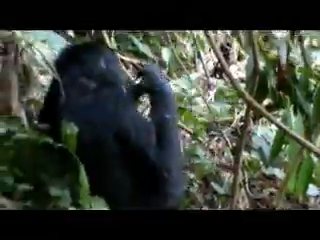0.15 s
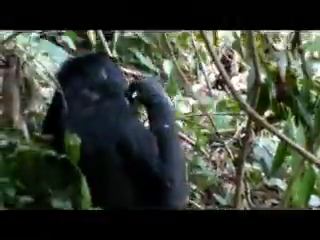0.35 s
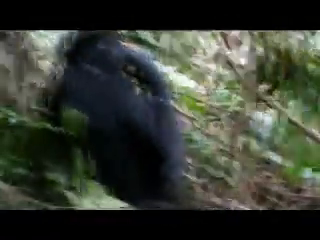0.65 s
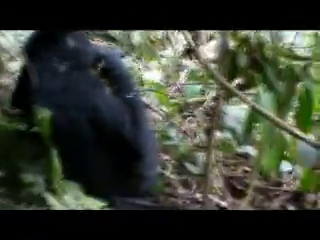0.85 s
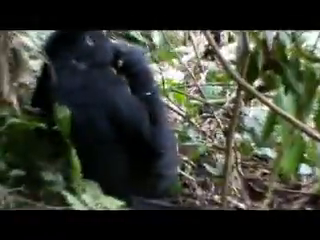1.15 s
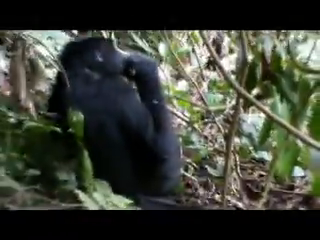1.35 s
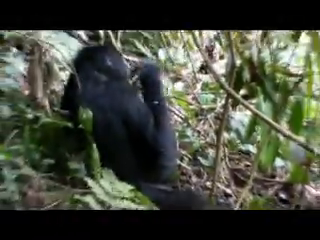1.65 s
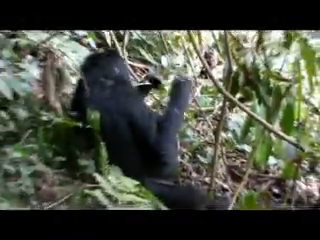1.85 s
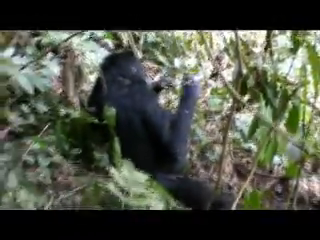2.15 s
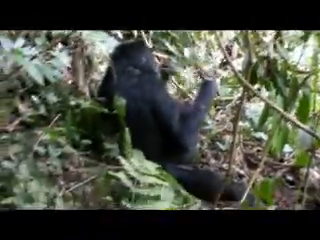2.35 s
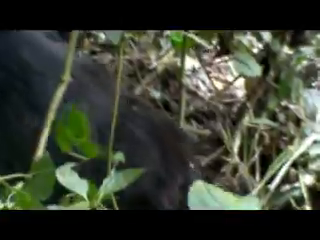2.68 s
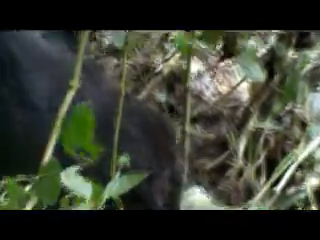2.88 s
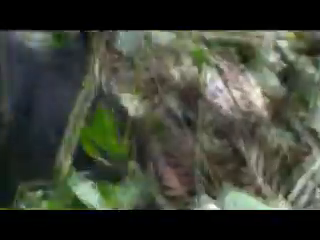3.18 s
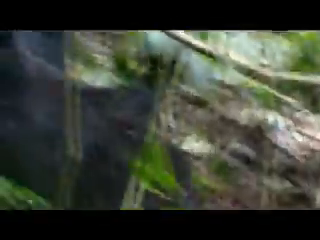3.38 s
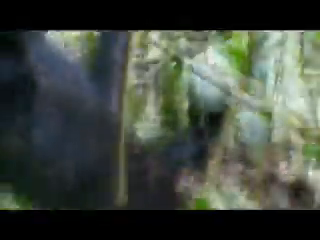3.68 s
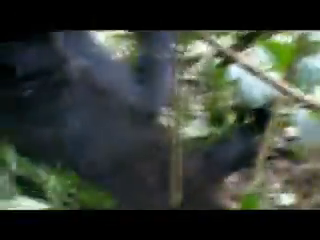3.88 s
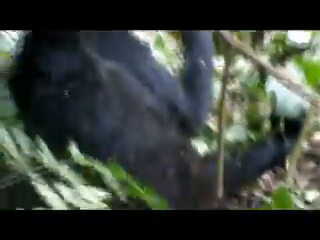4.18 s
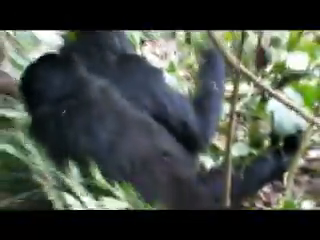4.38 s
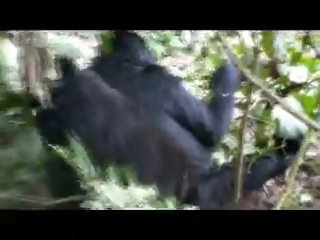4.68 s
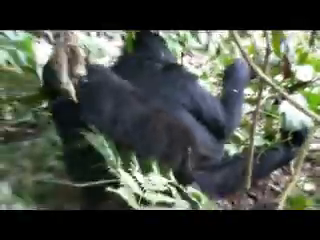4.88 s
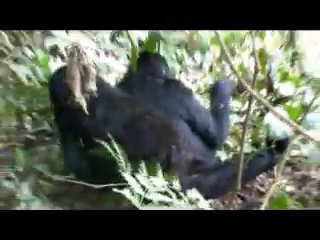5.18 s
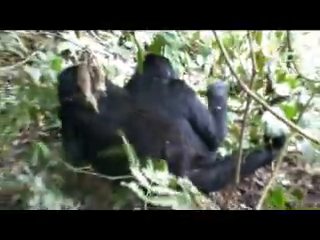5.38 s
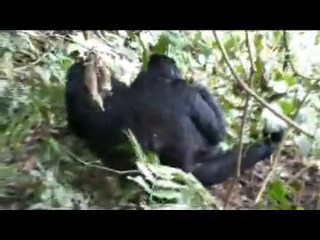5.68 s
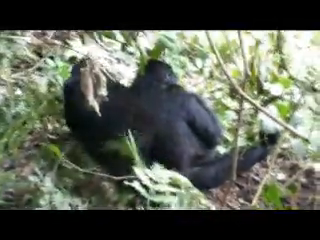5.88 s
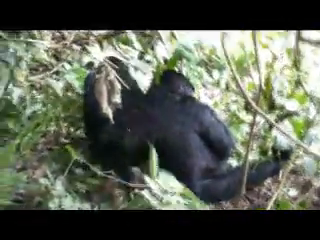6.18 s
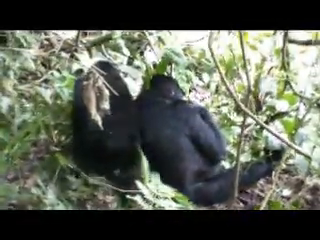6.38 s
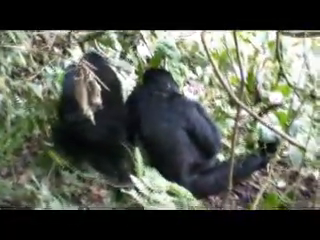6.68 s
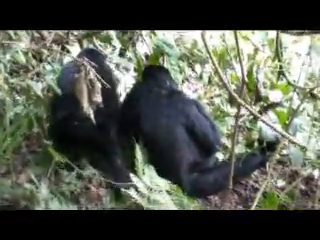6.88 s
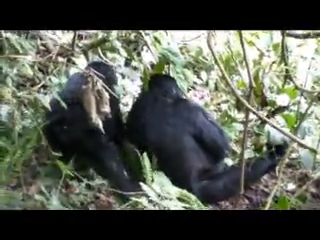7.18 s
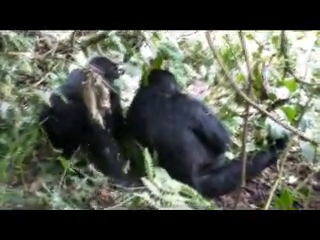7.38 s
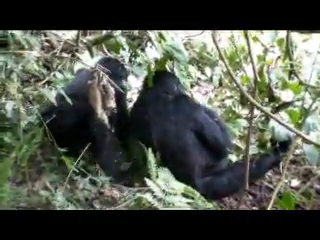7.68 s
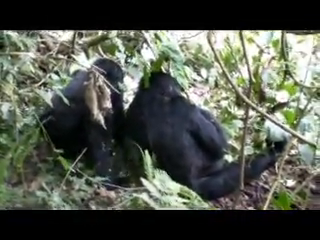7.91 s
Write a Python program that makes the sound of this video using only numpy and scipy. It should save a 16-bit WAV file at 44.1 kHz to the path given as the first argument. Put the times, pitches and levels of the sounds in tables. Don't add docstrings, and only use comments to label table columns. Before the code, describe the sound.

Large apes shift in dense undergrowth, leaves rustling and crackling as stems and twigs snap sharply over faint insect song and forest hush.

```python
import sys
import numpy as np
from scipy import signal
from scipy.fft import rfft, irfft, next_fast_len
from scipy.io import wavfile
from scipy.ndimage import uniform_filter1d, minimum_filter1d

SR = 44100
rng = np.random.default_rng(int(sys.argv[2]) if len(sys.argv) > 2 else 0)


def ratio_of_db(decibels):
    return 10 ** (np.asarray(decibels, float) / 20)


def dump(signal):
    limited = np.clip(np.atleast_2d(signal).T, -1, 1)
    pcm = np.round(limited * 32767).astype(np.int16)
    wavfile.write(sys.argv[1], SR, pcm)


N = 355005


def rms_one(x):
    return x / np.sqrt(np.mean(x ** 2) + 1e-20)


def at_peak(x, db):
    return ratio_of_db(db) * x / np.abs(x).max()


def drift(rate_hz):
    r = np.exp(-80 * np.pi * rate_hz / SR)
    slow = signal.lfilter([1], [1, -2 * r, r * r], rng.standard_normal(N // 40 + 2002))[2000:]
    return np.interp(np.arange(N) / 40, np.arange(len(slow)), rms_one(slow))


def band(x, low_hz, high_hz):
    edges_hz = [low_hz, min(high_hz, .45 * SR)]
    return signal.sosfilt(signal.butter(2, edges_hz, "band", fs=SR, output="sos"), x)


def resonance(x, hz, width_hz):
    r = np.exp(-np.pi * width_hz / SR)
    poles = [1, -2 * r * np.cos(2 * np.pi * hz / SR), r * r]
    return signal.lfilter([(1 - r * r) / 2, 0, (r * r - 1) / 2], poles, x)


def add(out, start_s, piece):
    i = round(start_s * SR)
    out[i:i + len(piece)] += piece[:N - i]


def first_scene():
    return np.arange(N) / SR < SCENE_CHANGE[3][0]


# most_force_s, build_up_s per 10 dB, dying_s per 10 dB, dry_leaf_db, weight_db
PUSHES = [(0.08, .03, .05, -54, 6), (0.268, .035, .015, -50, -3), (0.335, .015, .04, -55, 3),
          (0.425, .025, .06, -49, -6), (.465, .04, .04, -49, -3), (.50, .04, .025, -49, -8),
          (.60, .04, .02, -55, -3), (0.70, .015, .06, -54, 8), (0.88, .05, .25, -54, 8),
          (.95, .1, .1, -54, 6), (1.07, .04, .03, -53, 4), (1.125, .03, .07, -52, 4),
          (1.25, .08, .2, -51, 3.5), (1.39, .12, .04, -55, 3), (1.475, .04, .05, -49, -3),
          (1.518, .025, .02, -43, -5), (1.575, .05, .035, -46, -4), (1.65, .05, .05, -55, 2),
          (1.692, .006, .02, -44, -6), (1.74, .08, .15, -57, 6), (1.87, .14, .05, -54, 1),
          (1.97, .04, .04, -62, 9), (2.088, .025, .05, -52, 2), (2.128, .03, .025, -54, 9),
          (2.335, .1, .03, -55, 0), (2.378, .03, .022, -37, -4), (2.425, .03, .07, -46, -2),
          (2.475, .06, .14, -47.5, 2),
          (2.631, 0.041, 0.058, -39, -1), (2.667, 0.0069, 0.05, -39, -7),
           (2.70, 0.024, 0.0082, -34.5, -5.5), (2.75, 0.027, 0.054, -51, 6), (2.80, .008, .02, -56, 4),
           (2.835, 0.04, 0.068, -43.5, 8), (2.86, 0.034, .035, -51, 12), (2.91, 0.03, 0.12, -45.5, 4),
           (3.10, 0.077, 0.099, -48, 4), (3.211, 0.053, 0.064, -43, 2.5), (3.275, 0.04, 0.036, -47.5, 2),
           (3.36, 0.017, 0.058, -50, 4.5), (3.41, 0.051, 0.071, -47.5, 6), (3.641, 0.15, 0.034, -52.5, 2),
           (3.731, 0.027, 0.063, -50.5, 3), (3.92, 0.027, 0.036, -49, 5), (4.038, 0.019, 0.019, -37, -0.5),
           (4.111, 0.096, 0.063, -40.5, 2), (4.28, 0.04, 0.27, -43.5, -1.5), (4.55, 0.18, 0.41, -59, -4),
          (5.11, 0.051, 0.18, -51, 1), (5.232, .03, .02, -44, 3), (5.246, 0.012, 0.012, -41, -1),
            (5.265, .015, .06, -39, 2), (5.385, 0.013, .012, -53, 4), (5.455, 0.12, .02, -45, 1),
            (5.47, 0.012, 0.03, -43, 2), (5.52, .05, .2, -47, 1), (5.70, 0.042, 0.075, -44, -1),
            (5.84, 0.044, 0.34, -48, 1.5), (6.02, 0.15, 0.22, -51, 1), (6.33, 0.059, 0.16, -52.5, 3),
            (6.55, 0.091, 0.12, -43, -2), (6.74, 0.17, 0.17, -45.5, 0.5), (6.89, 0.11, 0.093, -47, 0.5),
            (7.029, 0.05, 0.027, -49, 6), (7.21, 0.42, 0.086, -51, 1), (7.375, 0.014, 0.022, -30, -6),
            (7.42, 0.047, 0.19, -46, 0.5), (7.575, 0.26, 0.06, -41, -4), (7.655, 0.035, 0.066, -50.5, -2),
            (7.755, 0.04, 0.053, -43.5, 0.5), (7.806, 0.052, 0.033, -45.5, -1.5),
            (7.86, 0.04, 0.05, -53, -0.5), (7.99, 0.073, 0.072, -58, -0.5)]
# offset_db, force_share [ratio], weight_share [ratio], wander_db
ANSWERS = [
    (0.5, 0.9, 0.055, 0),
    (-8.5, 0.97, 1.0, 0.5),
    (-19, 0.67, 1.4, 3),
    (-31.5, 0.23, 1.2, 1),
]


def pushes():
    mean_push_db, stir_db = -46, -63
    t, power = np.arange(0, N + 64, 64) / SR, 0
    offset_db, force, heavy, wander_db = np.transpose(ANSWERS)[:, :, None]
    for s, rise_s, fall_s, db, weight_db in PUSHES:
        rising, falling = (s - t) / max(rise_s, .005), (t - s) / max(fall_s, .005)
        slope_db = -10 * np.where(t < s, rising, falling)
        power = power + ratio_of_db(2 * (force * (db - mean_push_db) + heavy * weight_db + slope_db))
    stir = ratio_of_db(2 * (stir_db - mean_push_db))
    level_db = mean_push_db + offset_db + 10 * np.log10(power + stir)
    return [np.interp(np.arange(N) / 64, np.arange(len(t)), row) + db * drift(6.0)
            for row, db in zip(level_db, wander_db[:, 0])]


# low_hz, high_hz, tilt_db per octave, grains_per_s, size_spread_db, smooth_share [ratio]
LEAF_KINDS = [
    (5214, 11680, 6, 2400, 3, .5),
    (1558, 4460, 3.5, 1000, 3.5, .45),
    (495, 1600, -1, 960, 3, .7),
    (56, 320, -1.5, 91, -2, .7),
]


def leaves():
    out, clumps = np.zeros(N), drift(40.0)
    for level_db, (low_hz, high_hz, tilt_db, per_s, spread_db, smooth) in zip(pushes(), LEAF_KINDS):
        sizes = ratio_of_db(spread_db * np.minimum(rng.exponential(1, N), 4.0)) * rng.choice([-1, 1], N)
        grains = rms_one(sizes * (rng.random(N) < per_s * ratio_of_db(4.0 * clumps) / SR))
        patch_of_grain = rng.integers(0, 6, N)
        edges_hz = np.geomspace(low_hz, high_hz, 7)
        smooth, layer = np.clip(smooth, 0, 1), 0
        for k in range(6):
            crackle = np.sqrt(6) * grains * (patch_of_grain == k)
            rub = smooth * rng.standard_normal(N) + (1 - smooth) * crackle
            patch_db = tilt_db * np.log2(edges_hz[k] / low_hz) + 0.9 * drift(12.0) + .7 * clumps
            layer = layer + ratio_of_db(patch_db) * band(rub, edges_hz[k] / 1.102, edges_hz[k + 1] * 1.164)
        out += ratio_of_db(level_db + 0.5) * rms_one(layer)
    return out


def volleys(rows, fade_s, usual_db, spread_db, rise_s, break_db):
    longer_per_db = 0.34
    t = np.arange(SR // 10) / SR
    fibres, uneven = rng.standard_normal((len(rows), 2, len(t))).transpose(1, 0, 2)
    fade_s = fade_s * ratio_of_db(longer_per_db * (np.array(rows)[:, 1:2] - usual_db))
    out = fibres * ratio_of_db(spread_db * uneven - 60 * t / fade_s) * np.minimum(t / rise_s, 1)
    out[:, 8] += ratio_of_db(break_db)
    return out


# start_s, peak_db, ring_hz, lower_ring_hz, splinter_peak_db
SNAPS = [(0.697, -28, 4500, 1560, -40), (1.6883, -38.5, 3230, 2860, -17), (2.1266, -24, 4200, 2950, -38),
         (2.3562, -31, 3450, 2950, -19), (2.3774, -26.5, 3730, 3100, -15), (2.604, -31, 5640, 3470, -36),
         (2.6217, -28, 3400, 2220, -24), (2.6636, -30, 3600, 2220, -27), (2.685, -37, 2820, 2220, -33),
         (2.824, -34.5, 2470, 1390, -33), (3.2197, -34, 3420, 2110, -26), (3.277, -33, 3300, 1980, -37),
         (3.3606, -35, 3180, 2880, -20.5), (3.397, -38, 4460, 2900, -26.5), (4.0326, -27, 3800, 3200, -22),
         (4.036, -28, 4130, 3560, -16.5), (4.2727, -37.5, 3770, 2230, -38),
         (5.1058, -42, 3770, 2580, -28.5), (5.4667, -35.5, 3420, 1910, -25), (5.832, -31, 3260, 2830, -27),
         (7.0357, -36, 3600, 2080, -19.5), (7.3710, -23, 4880, 4000, -22)]
# start_s, peak_db, ring_hz, lower_ring_hz
TWIGS = [(0.036, -40, 3200, 2630), (0.068, -39.5, 3360, 2840), (0.08, -41.5, 3700, 2930),
         (0.8545, -39, 3370, 2600), (0.973, -38, 3350, 1670), (1.2268, -38, 3700, 2170),
         (1.475, -43, 3460, 1970), (1.7693, -39.5, 3800, 2630), (1.8187, -37, 3800, 2720),
         (1.855, -42.5, 3770, 3020), (1.872, -43, 3770, 2850), (1.9716, -37, 4050, 2820),
         (2.294, -40.5, 2210, 1470), (2.383, -31, 3530, 2870), (2.5702, -38.5, 3820, 1800),
         (2.6245, -34, 3040, 2150), (2.636, -32, 3600, 2220), (2.6421, -37, 3400, 2250),
         (2.6675, -32.5, 3540, 2280), (2.7987, -35, 3350, 2270), (2.838, -34, 2210, 1480),
         (2.851, -33.5, 2420, 1690), (2.864, -38, 3580, 2020), (3.1056, -35.5, 3560, 2800),
         (3.4096, -34.5, 2900, 2300), (4.413, -42, 3900, 2770), (5.1818, -36.5, 2780, 1690),
         (5.2336, -36, 3430, 2660), (5.2565, -32.5, 3020, 2500), (5.263, -33, 3100, 2430),
         (5.272, -40, 3950, 2950), (5.245, -37, 4300, 3300), (5.384, -37, 4160, 3170),
         (5.421, -35, 4100, 3300), (5.5953, -37.5, 3500, 2800), (5.7308, -39, 2880, 2200),
         (6, -37, 3400, 2920), (7.261, -47, 3230, 2325), (7.375, -30.5, 4750, 1760),
         (7.3782, -31, 4120, 3020), (7.8485, -37.5, 3530, 2750)]


def snaps():
    out, rows = np.zeros(N), [row[:4] for row in SNAPS] + TWIGS
    torn = volleys(rows, fade_s=.016, usual_db=-34.0, spread_db=3.5, rise_s=0.00056, break_db=17.95)
    for (s, peak_db, hz, lower_hz), volley in zip(rows, torn):
        ring = resonance(volley, hz, .16 * hz)
        ring -= ratio_of_db(-1.5) * resonance(volley, lower_hz, .13 * lower_hz)
        ring += 0.39 * resonance(volley, 1.55 * hz, .15 * hz)
        thin = np.clip(0.25 * ratio_of_db(-.4 * (peak_db + 25.5)), 0, 1)
        add(out, s, at_peak(ring + thin * band(volley, 1700, 5500), peak_db + 3.0))
    return out


# start_s, peak_db, pitch_hz
CRACKS = [(0.4272, -33, 10500), (.466, -32, 9000), (.487, -38, 10500), (1.116, -28.5, 8850),
          (1.465, -30.5, 9800), (1.505, -40, 11900), (1.5174, -20, 12500), (1.696, -28, 9600),
          (2.3655, -24, 12200), (2.3722, -16, 12600), (2.3828, -14, 10000), (2.42, -28, 11500),
          (2.4266, -30, 9500), (2.4335, -33, 10000), (2.9075, -32, 8350), (3.192, -30, 10200),
          (4.0904, -27, 9000), (4.1000, -23.5, 8400), (4.1135, -35, 8500), (7.5083, -22.5, 8560),
          (5.229, -28, 11800), (5.2423, -32, 7660), (5.26, -29, 7900), (5.268, -31, 8800),
          (5.279, -32, 8800), (5.454, -25, 10000), (5.4947, -32.5, 8440), (5.695, -31, 10400),
          (5.731, -31, 10100), (6.8882, -27, 9050), (7.3607, -24, 9530), (7.375, -20, 12800),
          (7.463, -25, 9800), (7.4713, -26, 8900), (7.5012, -18.5, 10600), (7.567, -24, 7940)]


def cracks():
    splinters = [(row[0], row[4], 9800) for row in SNAPS]
    out, rows = np.zeros(N), CRACKS + splinters
    torn = volleys(rows, fade_s=0.028, usual_db=-27.5, spread_db=3.5, rise_s=0.00036, break_db=20.1)
    for (s, peak_db, hz), volley in zip(rows, torn):
        brittle = resonance(volley, hz, 0.29 * hz) + 0.36 * volley
        add(out, s, at_peak(band(brittle, 5200, 16800), peak_db + 2.5))
    return out


# start_s, peak_db, pitch_hz
KNOCKS = [(1.688, -46.5, 603), (2.001, -49.5, 500), (2.127, -37, 1840), (2.571, -46.5, 710),
          (2.619, -45, 800), (2.661, -45.5, 700), (2.797, -39, 1380), (3.065, -48.5, 1120),
          (3.275, -52, 480), (5.104, -46, 1430), (5.234, -44.5, 1060), (5.467, -46.5, 1170),
          (5.83, -45, 720), (6.332, -47.5, 835), (7.374, -46, 810), (7.849, -49.5, 790)]


def knocks():
    out = np.zeros(N)
    torn = volleys(KNOCKS, fade_s=.038, usual_db=-46.5, spread_db=2.7, rise_s=0.00068, break_db=17)
    for (s, peak_db, hz), volley in zip(KNOCKS, torn):
        hollow = resonance(volley, hz, 0.18 * hz) + 0.24 * band(volley, 250, 2000)
        add(out, s, at_peak(hollow, peak_db + 3.0))
    return out


# start_s, peak_db, pitch_hz
TICKS = [(0.0679, -33.5, 3100), (.2216, -40, 12000), (.2701, -37, 9500), (.3241, -39, 7500),
         (.4426, -35, 9500), (1.5107, -28, 13000), (1.5281, -30, 10500), (1.5946, -21, 12100),
         (1.7711, -35, 3300), (1.7841, -41, 2500), (1.8191, -36, 3300), (1.8561, -38, 3400),
         (1.9711, -36, 3600), (2.0811, -34, 9800), (2.1269, -27, 10000), (2.1273, -29, 8000),
         (2.3581, -16, 10200), (2.378, -10, 12500), (2.6216, -29, 5500), (2.6371, -31, 5300),
         (2.6633, -27, 6500), (2.6861, -21, 8800), (3.0185, -25, 9500), (3.0186, -30, 5200),
         (3.0187, -35, 2800), (3.3984, -22, 12300), (3.7291, -44, 1350), (4.5613, -26, 9700),
         (5.1049, -37, 2400), (5.2439, -24, 7900), (5.4426, -30, 10500), (5.4956, -27, 10500),
         (5.5676, -27, 9700), (5.8471, -31, 8500), (6.1372, -31, 9600), (6.2223, -29, 7500),
         (6.3291, -39, 1140), (6.3315, -21, 10000), (6.4333, -28, 9800), (7.0304, -28, 10500),
         (7.2926, -34, 8800), (7.6326, -26, 8850), (7.6521, -27, 9900), (7.6881, -33, 9000),
         (7.9291, -34, 10000), (8.0001, -33, 9500)]


def ticks():
    out, click = np.zeros(N), np.zeros(SR // 100)
    click[0] = 1
    for (s, peak_db, hz), sign in zip(TICKS, rng.choice([-1, 1], len(TICKS))):
        damped = resonance(resonance(click, hz, .45 * hz), hz, 0.79 * hz)
        add(out, s, sign * at_peak(damped, peak_db))
    return out


# start_s, peak_db, pitch_hz, fade_s (time to fall by about 120 dB)
RINGS = [(1.6905, -43.5, 3250, 0.037), (2.1272, -27.5, 2990, 0.027), (2.128, -33, 5300, 0.014),
         (2.1267, -19.5, 4100, 0.022), (2.1288, -25, 4500, 0.021), (2.1275, -30, 3650, .02),
         (2.128, -33, 1500, .025), (2.5712, -44, 707, .05), (2.622, -30, 5700, 0.034),
         (7.372, -33, 3220, 0.04), (7.37, -29, 4360, 0.018), (2.356, -43.5, 1310, 0.042),
         (2.622, -31, 2240, 0.049), (2.6222, -33, 3480, 0.032), (2.637, -38, 2340, 0.033),
         (2.664, -37.5, 2330, 0.045), (2.664, -37.5, 3400, 0.025), (2.685, -38, 2240, 0.031),
         (3.276, -34.5, 1980, .03), (3.344, -46.5, 1157, .1), (5.468, -43, 1900, .04),
         (7.26, -41, 2310, 0.049), (7.374, -39, 1767, 0.049), (7.372, -30, 5400, .03),
         (7.373, -27, 8000, .025)]


def rings():
    out, t = np.zeros(N), np.arange(SR // 8) / SR
    for (s, peak_db, hz, fade_s), noise in zip(RINGS, rng.standard_normal((len(RINGS), len(t)))):
        knock = noise * ratio_of_db(-120 * t / fade_s)
        add(out, s, at_peak(resonance(knock, hz, 4.6 / fade_s), peak_db))
    return out


# start_s, peak_db, pitch_hz
THUMPS = [(.354, -68, 71), (0.676, -53, 101), (1.048, -57, 90), (1.889, -54, 151), (2.106, -44, 104),
          (2.559, -53, 80), (2.616, -52, 69), (2.82, -53, 89.5), (3.26, -55, 113), (3.614, -58, 55.4),
          (3.71, -62, 60.4), (5.087, -55, 152), (5.179, -60, 81), (5.238, -58, 89.5), (5.46, -69, 60),
          (5.813, -57, 110), (6.314, -52, 200), (7.355, -57.5, 60.5), (7.834, -57, 99)]


def thumps():
    out, t = np.zeros(N), np.arange(SR // 6) / SR
    for s, peak_db, hz in THUMPS:
        swing = ratio_of_db(peak_db + 5.5 - 60 * t * hz / 2.5) * np.sin(2 * np.pi * hz * t)
        add(out, s + 0.019, swing)
    return band(out, 45, 350)


# start_s, length_s, pitch_hz
GRUNT = (0.072, 0.045, 120.7)
# multiple [of the pitch], level_db
GRUNT_PARTIALS = [(1, -62.5), (2, -65), (3, -55), (4, -74)]


def grunt():
    out, (s, length_s, hz) = np.zeros(N), GRUNT
    t = np.arange(round(length_s * SR)) / SR
    voice = sum(ratio_of_db(db) * np.sin(2 * np.pi * k * hz * t) for k, db in GRUNT_PARTIALS)
    add(out, s, np.sin(np.pi * t / length_s) * voice)
    return out


# pitch_hz, width_hz, level_db
INSECTS = [
    [(5070, 60, -63), (5190, 50, -68), (5300, 50, -64), (5355, 35, -60), (5630, 40, -69), (6600, 900, -58)],
    [(5035, 70, -63.5), (5250, 45, -59.5), (5335, 50, -61.5), (5410, 40, -67.5), (5565, 55, -61), (6540, 300, -62)],
]


def insects():
    scenes = []
    for choruses in INSECTS:
        singing = 0
        for hz, width_hz, db in choruses:
            song = resonance(resonance(rng.standard_normal(N), hz, width_hz), hz, width_hz)
            singing = singing + ratio_of_db(db + 2.3 * drift(12.0)) * rms_one(song)
        scenes.append(singing)
    return np.where(first_scene(), scenes[0], scenes[1])


# pitch_hz, level_db per Hz
HUSH = [(18, -55), (30, -41), (97, -12.5), (270, -18.5), (395, -6), (872, -15.5), (2420, -10.5),
        (3550, -8.5), (4700, -13), (5210, -5.5), (5920, -6.5), (6560, -7.5), (7840, -10), (10100, -10.5),
        (13400, -12)]


def hush():
    hz, level_db = np.transpose(HUSH)
    size = next_fast_len(N)
    log_hz = np.log(np.fft.rfftfreq(size, 1 / SR) + 1)
    shape = ratio_of_db(np.interp(log_hz, np.log(hz), level_db))
    out = ratio_of_db(-51.0) * rms_one(irfft(rfft(rng.standard_normal(size)) * shape, size)[:N])
    treble = signal.sosfiltfilt(signal.butter(3, 7400, "high", fs=SR, output="sos"), out)
    return out - treble * (1 - ratio_of_db(-2.5)) * first_scene()


def scene():
    near, echo = snaps() + cracks() + knocks() + ticks() + rings(), np.zeros(N)
    add(echo, .0023, ratio_of_db(-14.5) * near)
    return (near + echo + thumps() + grunt() + leaves() + insects() + hush())[None]


# pitch_hz, width_hz, level_db
HOUSING = [(4700, 780, -2.5), (6290, 240, -5.5), (9300, 330, -2.5), (11190, 710, -5.5), (8520, 900, 1.5),
           (10200, 650, 1.5)]


def housing(x):
    for hz, width_hz, level_db in HOUSING:
        x = x - (1 - ratio_of_db(level_db)) * resonance(x, hz, width_hz)
    return x


# pitch_hz, step_db re the neighbourhood's rms
COARSE = [(300, -10), (1500, 3), (2500, 6.5), (4100, 9.5), (4500, 9.5), (4850, 6), (5000, -2), (9000, -2),
          (11400, 2), (13000, -2)]


def coarse_rounding(x, size=1024):
    n, k = np.arange(2 * size), np.arange(size)
    window = np.sin(np.pi * (n + .5) / (2 * size))
    basis = np.cos(np.pi / size * np.outer(k + .5, n + .5 + size / 2)) * window
    padded = np.pad(x, (size, 2 * size - len(x) % size))
    lines = np.lib.stride_tricks.sliding_window_view(padded, 2 * size)[::size] @ basis.T
    hz, step_db = np.transpose(COARSE)
    nearby = uniform_filter1d(lines ** 2, size=48, axis=1)
    mask = minimum_filter1d(nearby, size=3, axis=0)
    moody_db = 4.5 * np.repeat(rng.standard_normal((len(lines), size // 4)), 4, axis=1)
    step = np.sqrt(mask) * ratio_of_db(np.interp(k * SR / 2 / size, hz, step_db) + moody_db) + 1e-9
    frames = (np.round(lines / step) * step) @ basis * 2 / size
    return (frames[1:, :size] + frames[:-1, size:]).ravel()[:N]


# time_s, level_db
SCENE_CHANGE = [(0, 0), (2.527, 0), (2.529, -20), (2.545, -28), (2.551, -22), (2.556, -13), (2.5695, -7),
                (2.5705, 0), (8.05, 0)]


def dropout(x):
    s, level_db = np.transpose(SCENE_CHANGE)
    return x * ratio_of_db(np.interp(np.arange(N) / SR, s, level_db))


def band_limit(x):
    return signal.sosfilt(signal.butter(12, 14730, fs=SR, output="sos"), x)


def record(dry):
    x = dropout(coarse_rounding(housing(dry[0])))
    x = signal.sosfilt(signal.ellip(10, .5, 60, 13500, fs=SR, output="sos"), x)
    return band_limit(x[None])


dry = scene()
out = record(dry)
dump(out)
```